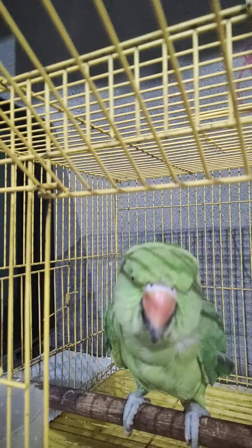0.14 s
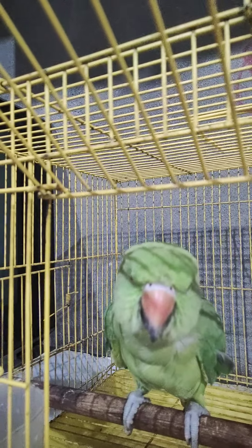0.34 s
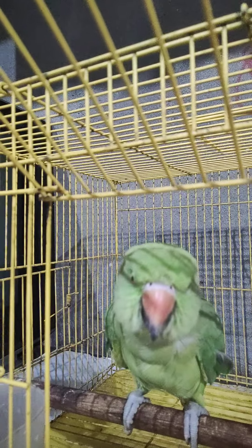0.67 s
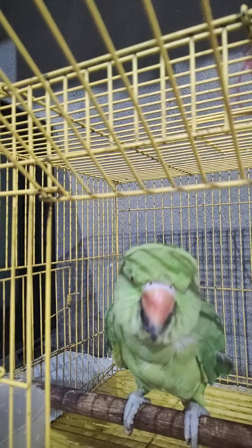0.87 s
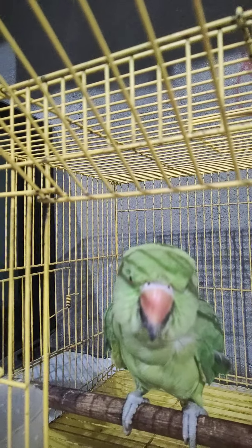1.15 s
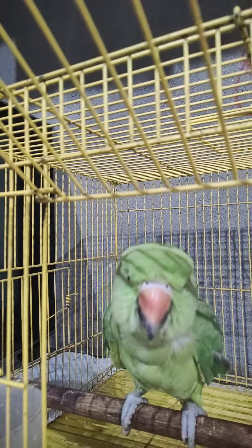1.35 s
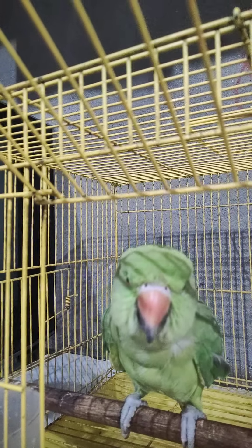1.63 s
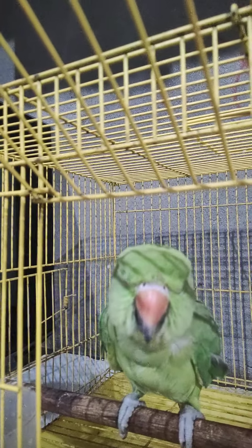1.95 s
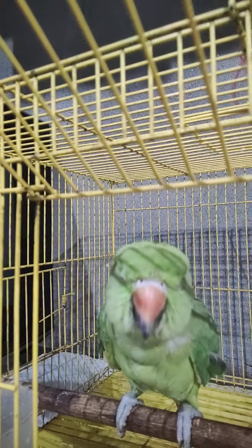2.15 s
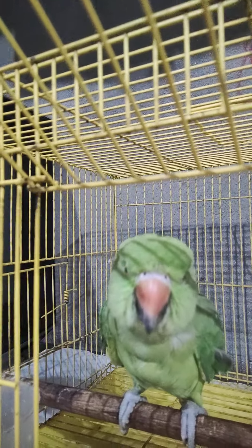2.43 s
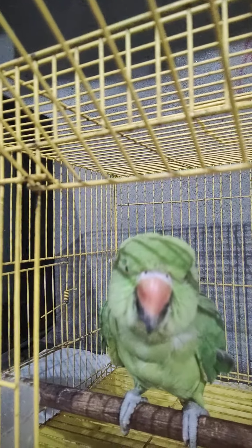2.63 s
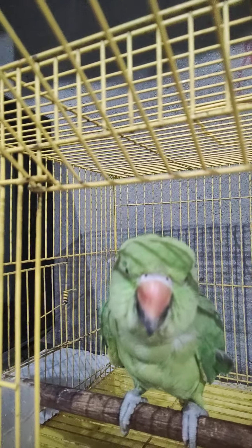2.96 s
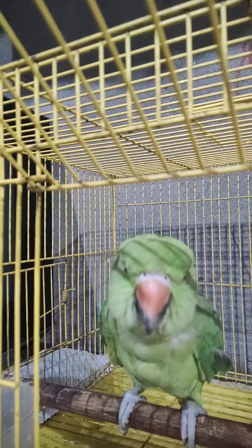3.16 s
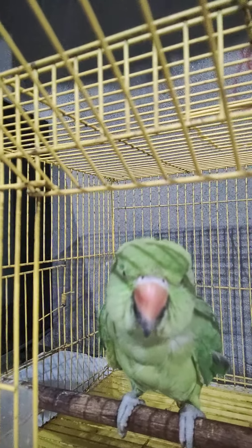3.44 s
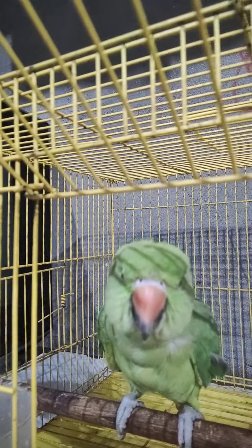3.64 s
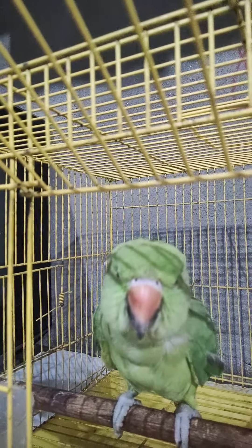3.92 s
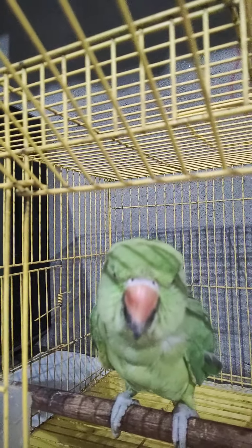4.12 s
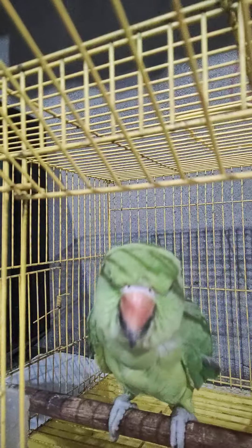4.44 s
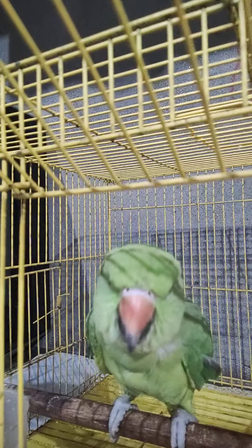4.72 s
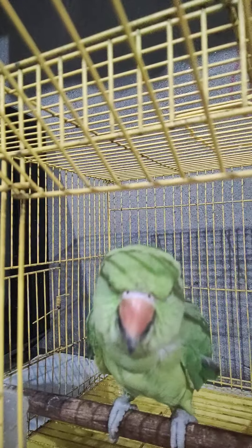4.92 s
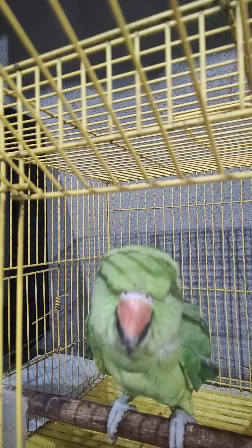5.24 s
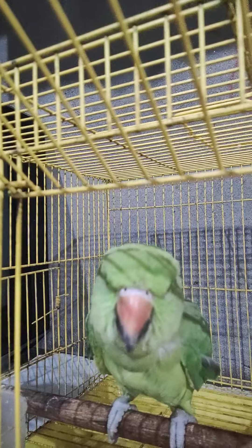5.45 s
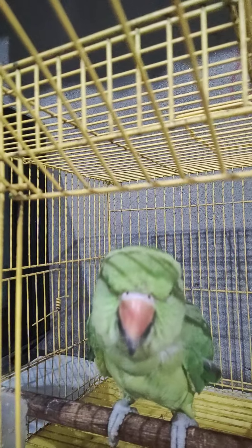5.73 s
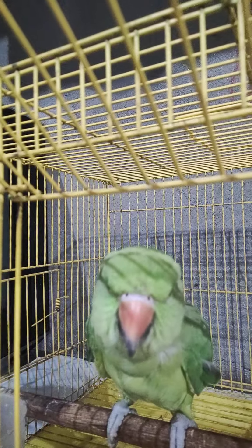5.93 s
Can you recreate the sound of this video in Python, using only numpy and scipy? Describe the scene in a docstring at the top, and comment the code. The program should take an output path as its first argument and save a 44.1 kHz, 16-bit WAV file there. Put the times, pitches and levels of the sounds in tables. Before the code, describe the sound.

A fan runs with a low hum and a soft rush of air in a small, slightly ringing room. Near the microphone, a parakeet makes brief squeaky chirps with little gaps between them, and one faint, distant hoot sounds early on. The bird clicks its tongue, gives a falling call and squeaks again, then ends with a thin held note and two lower sliding calls.

```python
"""Short squeaks, long slides and tongue clicks from a caged parakeet close to a phone.
Each call is a stack of harmonics coloured by throat and beak, with pulsing breath.
A small hard room rings at the start and after every call. A fan motor hums and its air rushes
throughout; a far hoot rises and falls once."""
import sys
import numpy as np
from scipy import signal
from scipy.fft import rfft, irfft
from scipy.io import wavfile
from scipy.ndimage import uniform_filter1d

SR = 44100
rng = np.random.default_rng(int(sys.argv[2]) if len(sys.argv) > 2 else 0)


def wrap_up_sound(samples):
    """Save the sound to the file named by the first command line argument, as 16-bit audio."""
    columns = np.atleast_2d(samples).T
    # keep every value between -1 and 1, then stretch to whole-number steps
    tamed = np.clip(columns, -1, 1)
    steps = np.round(tamed * 32767).astype(np.int16)
    wavfile.write(sys.argv[1], SR, steps)


N = 268128

# Each row: frequency in Hz, rms level in dB, waver in dB.
MOTOR_LINES = [(48.2, -45, 2.1), (95.8, -64, 3), (179, -67.5, 4)]
# Each row: frequency in Hz, relative density in dB.
RUSH_SPECTRUM = [(40, -19), (70, -8.5), (100, -5.5), (125, -16.5), (165, -7.5), (290, -7), (375, -5.5),
                 (600, -7), (1050, -14.5), (1500, -15), (2400, -20.5), (4200, -32.5), (8500, -46),
                 (13500, -51), (15400, -59.5)]
# Each row: frequency in Hz, left-right correlation.
RUSH_CORRELATION = [(60, .99), (130, .98), (290, .93), (450, .75), (700, .3), (1410, -.24), (3100, 0),
                    (15000, .05)]
# Each row: start and length in seconds, opening, held and closing pitch in Hz, settling in seconds,
# peak position as share of length, opening, peak and closing level in dB, opening and closing throat
# resonance in Hz, fundamental in dB, treble slope in dB/octave, breath in dB, top band in dB.
SQUEAKS = [ (0.365, 0.053, 1030, 780, 810, 0.013, 0.6, -38, -38, -44, 1990, 2170, 7, -2.5, -17, -5.5),
           (0.584, 0.056, 1112, 844, 843.5, 0.016, 0.89, -35.5, -34, -49, 2290, 3700, 2.5, -8, -27, -0.5),
           (1.025, 0.077, 1356, 1297, 1331, 0.0055, 0.67, -28.5, -21.5, -24.5, 3060, 2620, -0.5, -13, -30, 0),
           (1.445, .05, 623, 517.6, 637, 0.0049, 0.1, -41, -36, -49, 3200, 3400, -3.5, -29, -16.5, -4.5),
           (1.645, 0.063, 1114, 953.7, 1045, .011, 0.54, -36, -26, -41.5, 2650, 3500, -13.5, -16.5, -26, -24),
           (2.99, 0.04, 1798, 1540, 1500, 0.0109, 0.17, -34.5, -36, -54.5, 1950, 3300, -4.5, -7.5, -15.5, -28),
           (3.389, .074, 619, 558, 639, 0.0055, 0.071, -50, -37.5, -52, 3520, 2600, -3, -40, -14, -11.5),
           (3.585, .069, 1178, 1047, 1059, 0.012, 0.92, -33, -29, -26.5, 2330, 2100, -7, -15.5, -25, -11),
           (4.18, 0.075, 1597, 1605, 1310, .008, .28, -33, -24.5, -38, 3730, 3100, -7, -2, -32, -29.5), ]
# Each row: frequency in Hz, gain in dB.
BEAK_RESPONSE = [(1000, 4), (2000, -0.5), (2700, 1), (3400, 3), (4300, -0.5), (5200, 3.5), (6200, 1.5),
                 (7100, 3), (8200, -1.5), (9500, -10), (11000, -2.5), (12500, -13.5), (14000, -5),
                 (15300, -25)]
# Each row: frequency in Hz, relative density in dB.
BREATH_SPECTRUM = [(500, -24), (1500, -6.5), (3300, 2), (4300, -13), (5200, -14), (6200, -4.5), (7200, -21),
                   (8600, -20), (9800, -21), (11200, -21), (12600, -29), (13900, -16.5), (15300, -34.5)]
# Weaker tones inside some calls. Each row: start and end in seconds, pitch ratio, relative level in dB.
SECOND_VOICE = [(1.031, 1.11, 1.735, -16), (1.02, 1.11, 2.735, -22), (3.603, 3.651, 3.6, -31),
                (4.17, 4.26, 1.71, -26.5), (4.52, 4.803, .76, -26)]
# Phone port shading. Each row: frequency in Hz, left minus right in dB, left lag in radians.
PORT_SHADING = [(600, 4.5, 0.12), (800, 8.5, 1.47), (1052, -6, 2.4), (1264, 12, 1.01), (1700, -5, 3.03),
                (2160, -10.5, 1.12), (2600, 1.5, 1.05), (3100, 7.5, 2.43), (4290, 4.5, 4.4),
                (4900, -4, 5.67), (5990, -2.5, 4.67), (6960, -5.5, 8.3), (11400, -3, 7.94),
                (14000, 7.5, 15.2)]
# Direct sound and bounces per port. Each row: delay in ms, gain in dB, sign.
LEFT_ARRIVALS = [(0, 4, 1), (4.1, -15.5, 1), (9.3, -9, -1), (14, -9, 1)]
RIGHT_ARRIVALS = [(0, 5.5, 1), (3.3, -16.5, -1), (7.9, -10.5, 1), (17, -15.5, 1)]
# Each row: low and high band edge in Hz, T60 in seconds.
ROOM_BANDS = [(332, 4600, 0.44), (1400, 3340, 0.19), (2900, 6100, 0.31), (6000, 20800, 0.26)]
# Each row: time in seconds, pitch in Hz, source level in dB.
HOOT_CURVE = [(0.71, 495, -47), (0.764, 627, -42), (0.796, 682.6, -47), (1.017, 736, -45.5),
              (1.079, 654, -44.5), (1.108, 641, -45.5), (1.172, 483.5, -43.5), (1.26, 490, -83)]
# One table per slide. Each row: time in seconds, pitch in Hz, level in dB, throat resonance in Hz,
# treble slope in dB/octave, breath in dB.
SLIDE_CURVES = [
    [(0.92, 1350, -64, 3160, -12, -50), (0.93, 1337, -40, 3430, -18, -42),
     (0.955, 1339, -35, 3740, -22, -42), (0.998, 1530, -36.5, 3830, -6.5, -21),
     (1.014, 1484, -31, 3800, -12, -35), (1.03, 1390, -31.5, 3600, -15, -35)],
    [(2.246, 1350, -38.5, 2900, -11, -26), (2.254, 1372, -34, 2800, -4, -21),
     (2.281, 1335, -31.5, 2600, -6.5, -42), (2.297, 1430, -29, 3000, -5, -14.5),
     (2.316, 1573, -26.5, 3770, -10.5, -28)],
    [(2.538, 1130, -63, 3830, -15, -47), (2.546, 1086, -37, 4160, -34, -42),
     (2.6, 942, -42.5, 3500, -29.5, -46), (2.654, 876, -43.5, 4050, -26, -39),
     (2.709, 763.5, -40, 3120, -23, -23), (2.74, 686, -35, 2770, -23, -23.5),
     (2.763, 669, -39, 3280, -34, -19), (2.825, 562, -45.5, 3100, -37, -24)],
    [(4.497, 2025, -42, 1920, -17, -31), (4.505, 1894, -46.5, 1800, -3.5, -27),
     (4.564, 1744, -41.5, 1700, -6.5, -27), (4.623, 1674, -38.5, 1700, -7.5, -46),
     (4.683, 1673, -37.5, 1700, -10.5, -38), (4.742, 1694, -37.5, 1700, -8.5, -29),
     (4.801, 1855, -38.5, 1700, 0, -36), (4.83, 1956, -31.5, 1900, -1.5, -37),
     (4.868, 2230, -33.5, 2150, -1, -36)],
    [(5.16, 650, -68, 1700, -25, -30), (5.168, 695, -46, 1700, -29, -35),
     (5.21, 757, -43.5, 1730, -25, -30), (5.251, 800, -34.5, 2680, -11, -16),
     (5.292, 905.3, -24.5, 2740, -9, -21), (5.315, 914.3, -31, 3100, -2.5, -38),
     (5.342, 912.5, -25.5, 3150, -20, -34)],
    [(5.432, 1076, -24.5, 2500, -21, -29), (5.439, 993, -27, 2500, -19, -26),
     (5.447, 946, -36, 2720, -13, -30), (5.475, 794, -36.5, 2160, -27, -21),
     (5.501, 727, -42, 1730, -32, -30), (5.55, 700.5, -35, 2600, -26, -26),
     (5.575, 771, -30.5, 2530, -15.5, -21), (5.598, 806, -29.5, 2600, -12.5, -27),
     (5.625, 866.6, -29.5, 2810, -10.5, -34), (5.655, 878, -48, 3150, -19, -34)],
]
# Each row: fundamental in dB, top band in dB, at one slide's loudest.
SLIDE_TONES = [(13.5, 4), (-1.5, -13), (-4.5, 1), (5.5, 3), (-11, -12), (-12.5, -14)]
# Each row: start in seconds, source peak in dB.
TONGUE_CLICKS = [(2.047, -22), (2.992, -34.5)]
# Each row: frequency in Hz, relative level in dB, T60 in seconds.
BEAK_MODES = [(638, -10.5, 0.04), (1346, 7, 0.0076), (2127, 15, 0.0058), (2500, -5, 0.016),
              (3060, 5, 0.0072), (4670, 1, 0.0054), (6300, 2, 0.0037), (7260, -7, 0.0064)]

HUM_DRIFT, HUM_PAN_DB = 0.00361, -1.27
RUSH_DB, RUSH_SWELL_DB, RUSH_FLICKER_DB = -49.5, .3, 1.2
THROAT_WIDTH_HZ, THROAT_DB, TOP_HZ = 1100, 14, 15380
ONSET_S, RELEASE_S, PUFF_S, PUFF_DB = 0.0014, 0.0095, 0.011, 5
RASP_RAD, FLUTTER_DB = .3, 2
# Colour change per dB below a call's peak; slope and breath apply to squeaks only.
FUNDAMENTAL_PER_DB, TOP_PER_DB, SLOPE_PER_DB, BREATH_PER_DB = 0.85, 1.08, -0.32, -0.25
BIRD_SEND_DB, HOOT_SEND_DB, HOOT_PAN_DB, ROOM_BUILD_S = -11, 2.5, 4, 0.0028


def undb(db):
    """dB to gain."""
    return 10 ** (np.asarray(db) / 20)


def level(x, db):
    """Scale to an rms level."""
    return x * undb(db) / np.sqrt(np.mean(x ** 2))


def colour(table, hz):
    """Read (Hz, value) points on a log-frequency axis."""
    f, v = np.transpose(table)
    return np.interp(np.log(np.maximum(hz, 1)), np.log(f), v)


def walk(rate_hz):
    """Random steps, smoothed twice; spread near 1."""
    k = int(SR / rate_hz)
    steps = np.repeat(rng.standard_normal(N // k + 1), k)
    return 1.19 * uniform_filter1d(uniform_filter1d(steps, k), k)[:N]


def pan(x, pan_db):
    """Stereo, left louder by pan_db."""
    return np.outer(undb([pan_db / 2, -pan_db / 2]), x)


def clock(start_s, end_s):
    """Sample times in seconds."""
    return np.arange(int(start_s * SR), int(end_s * SR)) / SR


def band_noise(lo_hz, hi_hz, n):
    """Uncorrelated stereo noise in one band."""
    sos = signal.butter(2, [lo_hz, hi_hz], "band", fs=SR, output="sos")
    return signal.sosfilt(sos, rng.standard_normal((2, n)))


def fan():
    """Wavering motor lines, plus an air rush whose octaves swell together and flicker alone."""
    rad_per_hz = 2 * np.pi * np.cumsum(1 + HUM_DRIFT * walk(0.82)) / SR
    hum = sum(np.sqrt(2) * undb(db + waver_db * walk(3.9)) * np.sin(hz * rad_per_hz)
              for hz, db, waver_db in MOTOR_LINES)
    f = np.fft.rfftfreq(N, 1 / SR)
    alike = np.clip(colour(RUSH_CORRELATION, f), -.99, .99)
    air = rfft(rng.standard_normal((2, N))) * undb(colour(RUSH_SPECTRUM, f))
    mid, side = air * np.sqrt([1 + alike, 1 - alike])
    stereo = np.array([mid + side, mid - side])
    octave = np.log2(np.maximum(f, 1) / 60)
    swell_db, rush = RUSH_SWELL_DB * walk(0.33), 0
    for k in range(9):
        band = irfft(stereo * np.clip(1 - np.abs(octave - k), 0, 1), N)
        rush += band * undb(swell_db + RUSH_FLICKER_DB * walk(5.2))
    return pan(hum, HUM_PAN_DB) + level(rush, RUSH_DB)


def opening_ring(start_db=-42.5, t60_s=0.31):
    """The room still rings from a call that has just ended."""
    return level(band_noise(1500, 3670, N), start_db) * 1000. ** (-np.arange(N) / SR / t60_s)


def squeak(start_s, length_s, open_hz, held_hz, close_hz, settle_s, peak_share, open_db, peak_db,
           close_db, open_throat_hz, close_throat_hz, first_db, slope_db_oct, breath_db, top_db):
    """Short call: pitch settles, then glides; level peaks once while the throat moves."""
    t = clock(start_s, start_s + length_s)
    age_s = t - start_s
    share = age_s / length_s
    hz = held_hz + (close_hz - held_hz) * share + (open_hz - held_hz) * np.exp(-age_s / settle_s)
    db = np.interp(share, [0, np.clip(peak_share, .05, .95), 1], [open_db, peak_db, close_db])
    slack_db = db.max() - db
    throat_hz = open_throat_hz + (close_throat_hz - open_throat_hz) * share
    breath_db = breath_db + BREATH_PER_DB * slack_db + PUFF_DB * np.exp(-age_s / PUFF_S)
    return voice(t, hz, db, throat_hz, slope_db_oct + SLOPE_PER_DB * slack_db, breath_db, first_db, top_db)


def top_band(hz):
    """Weight of the top band, 0 to 1."""
    return np.clip((hz - 8600) / 1200, 0, 1)


def tract_db(hz, throat_hz, slope_db_oct, top_db):
    """Source slope above 2 kHz, one throat resonance, beak colour and top band."""
    tilt_db = slope_db_oct * np.log2(np.clip(hz / 2000, 1, 4))
    throat_db = THROAT_DB / (1 + (2 * (hz - throat_hz) / THROAT_WIDTH_HZ) ** 2)
    return tilt_db + throat_db + colour(BEAK_RESPONSE, hz) + top_db * top_band(hz)


def voice(t, hz, db, throat_hz, slope_db_oct, breath_db, first_db, top_db):
    """Membrane harmonics, plus breath that puffs once a cycle; effort sets the colour."""
    hz, db = uniform_filter1d([hz, db], size=100, mode="nearest")
    slack_db = db.max() - db
    first_db = first_db + FUNDAMENTAL_PER_DB * slack_db
    top_db = top_db + TOP_PER_DB * slack_db
    pitch_shiver, level_shiver = uniform_filter1d(rng.standard_normal((2, len(t))), size=150)
    phase = 2 * np.pi * np.cumsum(hz * (1 + .03 * pitch_shiver)) / SR
    # Leaking air makes the membrane swing unevenly; high harmonics rasp first.
    jitter = level(np.convolve(rng.standard_normal(len(t)), np.hanning(160), "same"), 0)
    phase += RASP_RAD * undb(breath_db) * jitter
    k = np.arange(1, 27)[:, None]
    gain = undb(tract_db(k * hz, throat_hz, slope_db_oct, top_db) + first_db * (k == 1))
    gain *= k * hz < TOP_HZ
    gain /= np.sqrt(np.sum(gain ** 2, axis=0) / 2)
    flutter = uniform_filter1d(uniform_filter1d(rng.standard_normal(gain.shape), size=450), size=450)
    gain *= undb(level(flutter, 0) * FLUTTER_DB)
    tone = np.sum(gain * np.sin(k * phase + rng.uniform(0, 2 * np.pi, k.shape)), axis=0)
    for start_s, end_s, ratio, second_db in SECOND_VOICE:
        gate = np.clip(np.minimum(t - start_s, end_s - t) / 0.0055, 0, 1)
        tone += undb(second_db) * gate * np.sin(ratio * phase)
    f = np.fft.rfftfreq(len(t), 1 / SR)
    air_gain = undb(colour(BREATH_SPECTRUM, f) + top_db.mean() * top_band(f))
    air = level(irfft(rfft(rng.standard_normal(len(t))) * air_gain, len(t)), 0)
    breath = undb(breath_db) * air * (1 + 0.9 * np.cos(phase))
    edge = np.clip(np.minimum((t - t[0]) / ONSET_S, (t[-1] - t) / RELEASE_S), 0, 1)
    return (tone + breath) * undb(db + 5 * level_shiver) * edge


def near_paths(x):
    """Each port hears its own shading, lag and first bounces off tray and walls."""
    f, ports, out = np.fft.rfftfreq(N, 1 / SR), np.array(PORT_SHADING), []
    lag_rad = colour(ports[:, [0, 2]], f) * np.minimum(f / 500, 1)
    shade = np.sqrt(undb(colour(ports[:, [0, 1]], f))) * np.exp(-.5j * lag_rad)
    for port, paths in ((shade, LEFT_ARRIVALS), (1 / shade, RIGHT_ARRIVALS)):
        arrivals = sum(sign * undb(db) * np.exp(-2j * np.pi * f * ms / 1000) for ms, db, sign in paths)
        out.append(irfft(rfft(x) * port * arrivals, N))
    return np.array(out)


def room_response():
    """Dense late echoes; the lowest band rings longest."""
    t = clock(0, 0.5)
    tail = sum(band_noise(lo_hz, hi_hz, len(t)) * 1000. ** (-t / t60_s)
               for lo_hz, hi_hz, t60_s in ROOM_BANDS)
    tail *= 1 - np.exp(-(t / ROOM_BUILD_S) ** 2)
    return tail / np.sqrt(np.sum(tail ** 2, axis=1, keepdims=True))


def hoot(waver_db=4, fade_s=0.0094):
    """Far, nearly pure call sliding up and down."""
    times_s, hz, db = np.transpose(HOOT_CURVE)
    t = np.arange(N) / SR
    phase = 2 * np.pi * np.cumsum(np.interp(t, times_s, hz)) / SR
    edge = np.clip(np.minimum(t - times_s[0], times_s[-1] - t) / fade_s, 0, 1)
    return np.sqrt(2) * undb(np.interp(t, times_s, db) + waver_db * walk(40)) * edge * np.sin(phase)


def slide(rows, tone):
    """Long call following curves of pitch, effort, throat, brightness and breath."""
    times_s, *curves = np.transpose(rows)
    t = clock(times_s[0], times_s[-1])
    return voice(t, *(np.interp(t, times_s, curve) for curve in curves), *tone)


def tongue_click(crack_s=0.001, rise_s=0.0029):
    """A short push rings the beak cavities, with a crack of noise."""
    t = np.arange(2000) / SR
    ring = sum(undb(db) * np.sin(2 * np.pi * hz * t) * 1000. ** (-t / t60_s)
               for hz, db, t60_s in BEAK_MODES)
    crack = 0.13 * rng.standard_normal(len(t)) * np.exp(-t / crack_s)
    click = (ring + crack) * (1 - np.exp(-t / rise_s))
    return click / np.abs(click).max()


def parakeet():
    """All calls and clicks at the perch."""
    events = [(row[0], squeak(*row)) for row in SQUEAKS]
    events += [(rows[0][0], slide(rows, tone)) for rows, tone in zip(SLIDE_CURVES, SLIDE_TONES)]
    events += [(start_s, undb(db) * tongue_click()) for start_s, db in TONGUE_CLICKS]
    out = np.zeros(N)
    for start_s, sound in events:
        out[int(start_s * SR):][:len(sound)] += sound
    return out


def scene():
    """Bird near, hoot far, both in the room, over the fan."""
    bird, far = parakeet(), hoot()
    send = undb(BIRD_SEND_DB) * bird + undb(HOOT_SEND_DB) * far
    room = signal.fftconvolve(send[None], room_response(), axes=1)[:, :N]
    return near_paths(bird) + 0.58 * pan(far, HOOT_PAN_DB) + room + fan() + opening_ring()


def record(dry):
    """The phone cuts the top."""
    return signal.sosfilt(signal.ellip(8, .2, 70, TOP_HZ, fs=SR, output="sos"), dry)


dry = scene()
out = record(dry)
wrap_up_sound(out)
```